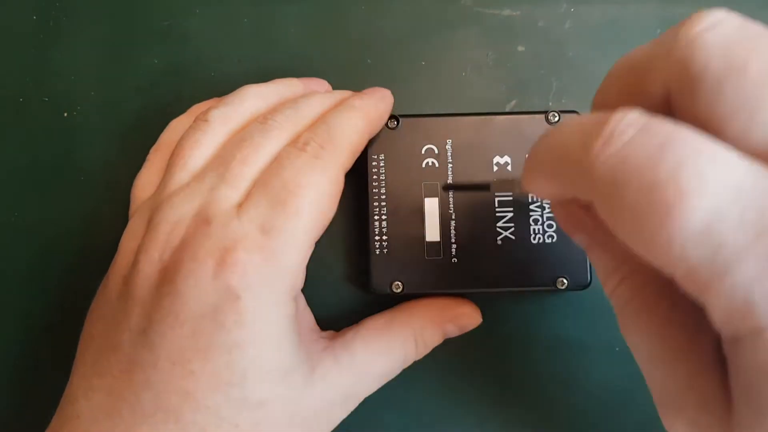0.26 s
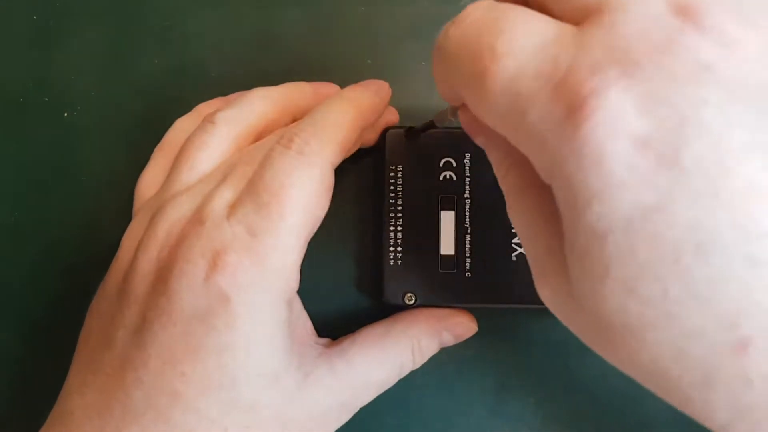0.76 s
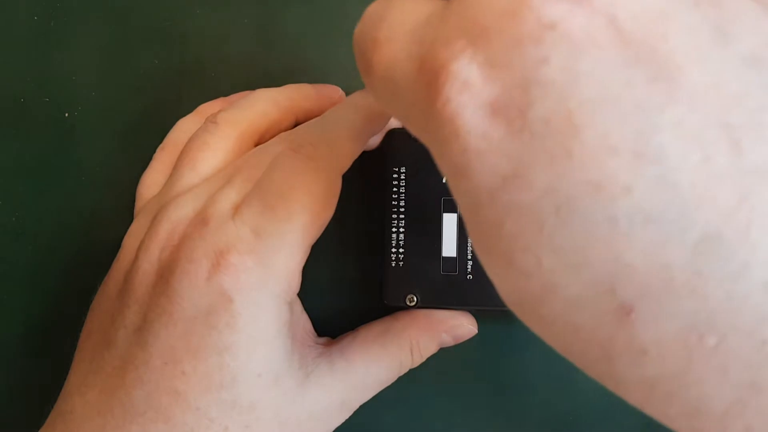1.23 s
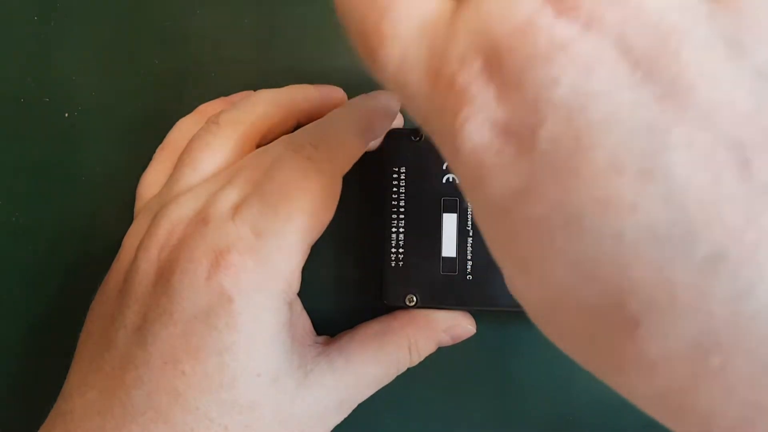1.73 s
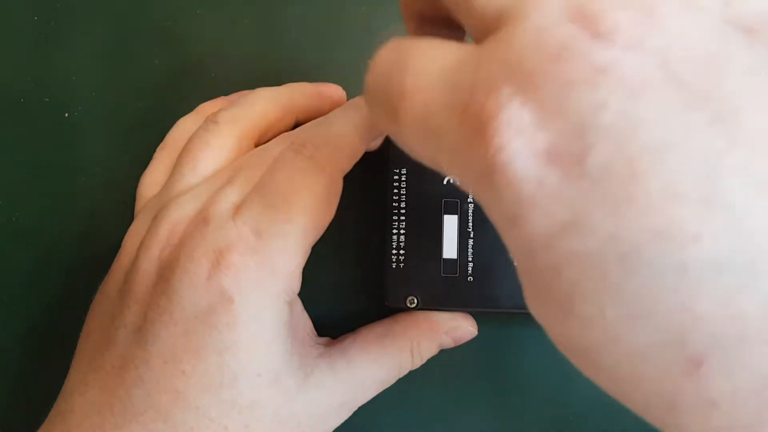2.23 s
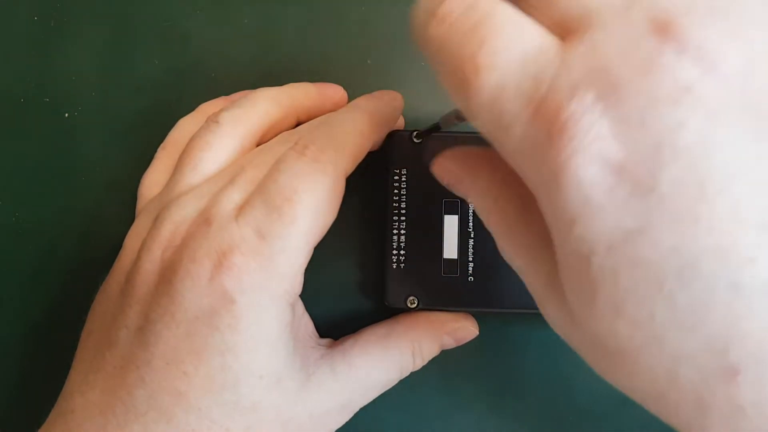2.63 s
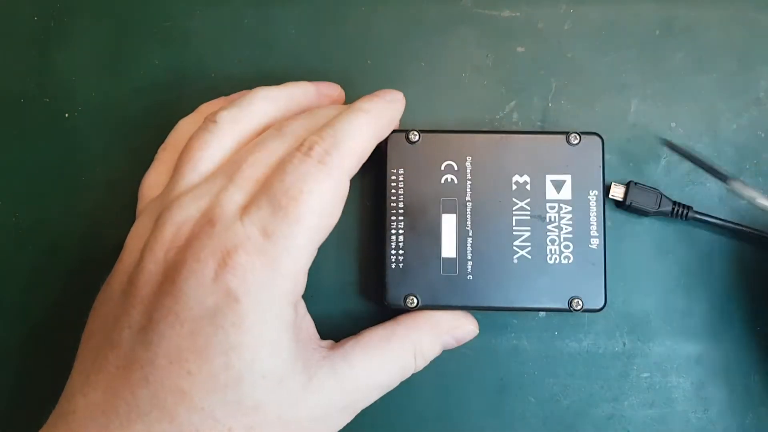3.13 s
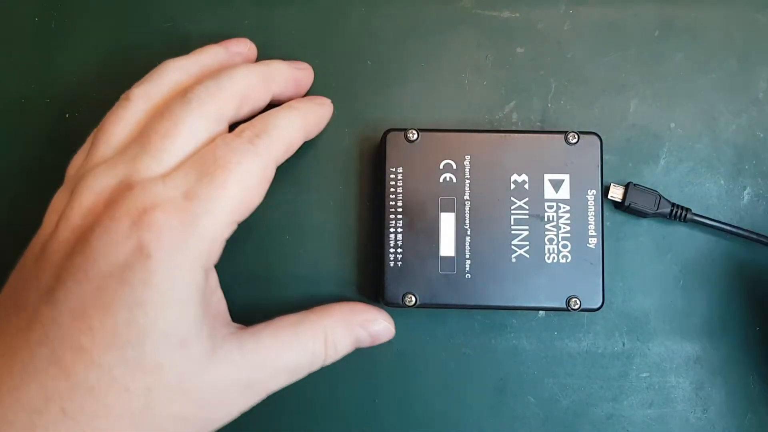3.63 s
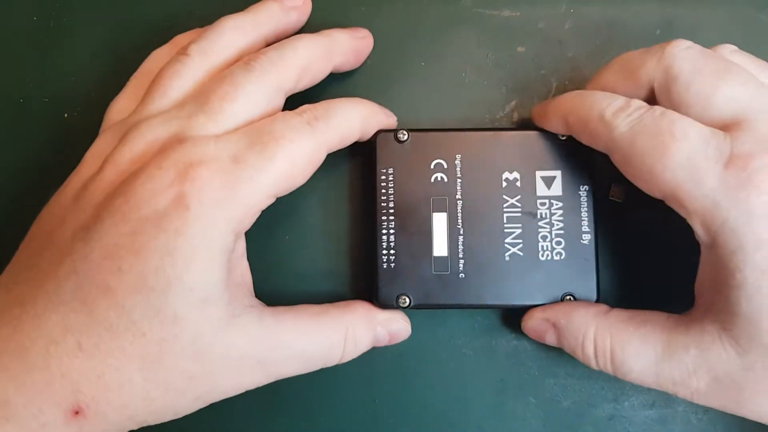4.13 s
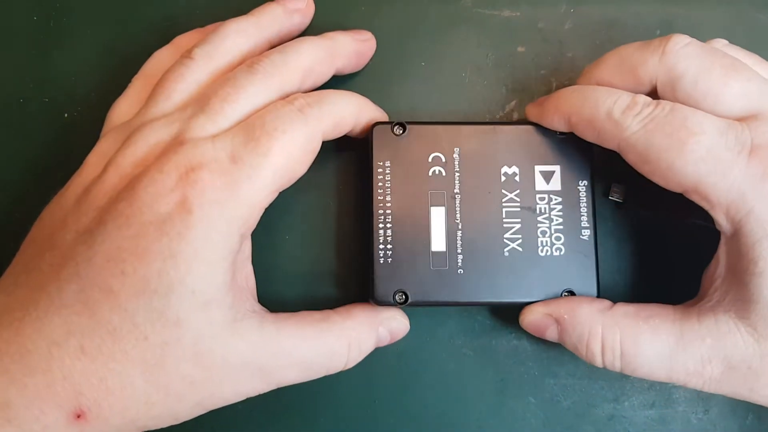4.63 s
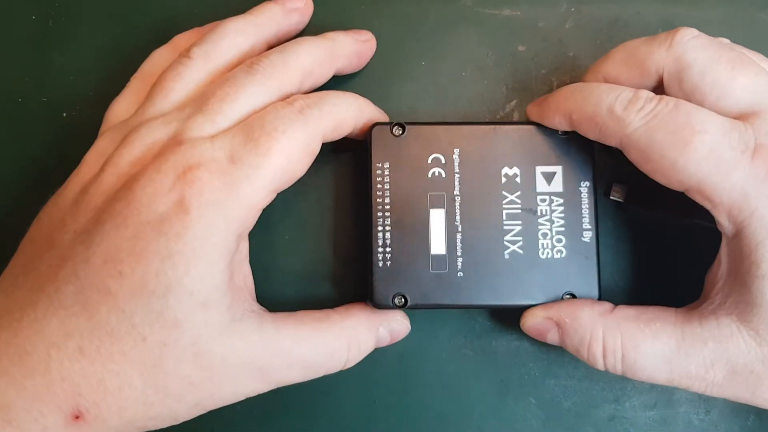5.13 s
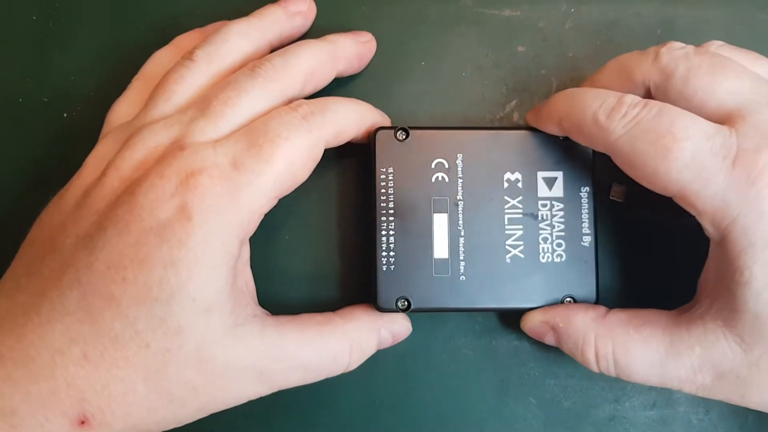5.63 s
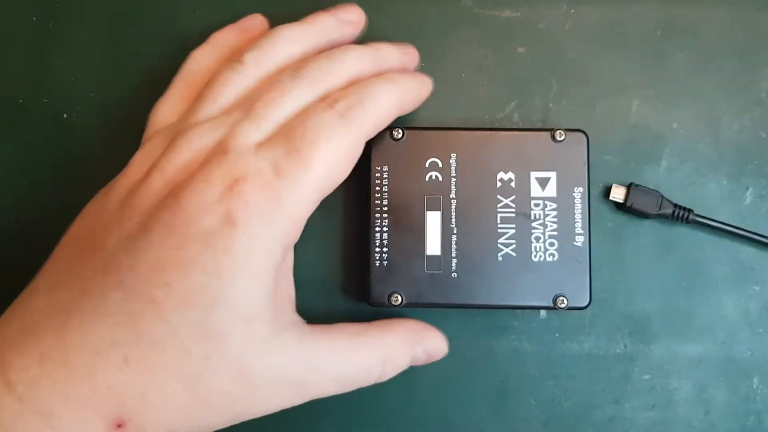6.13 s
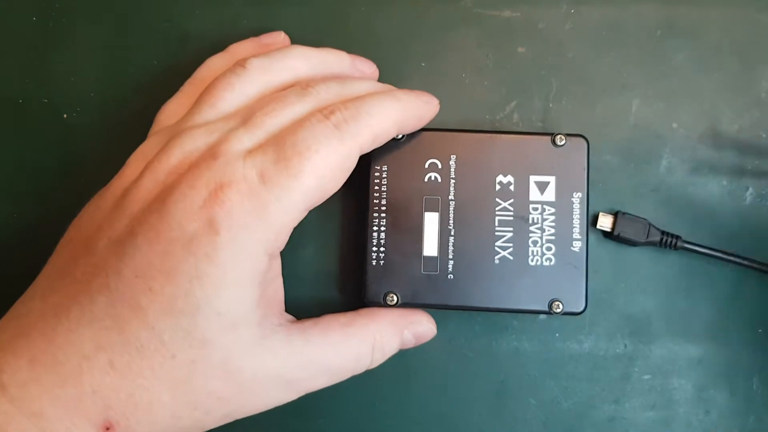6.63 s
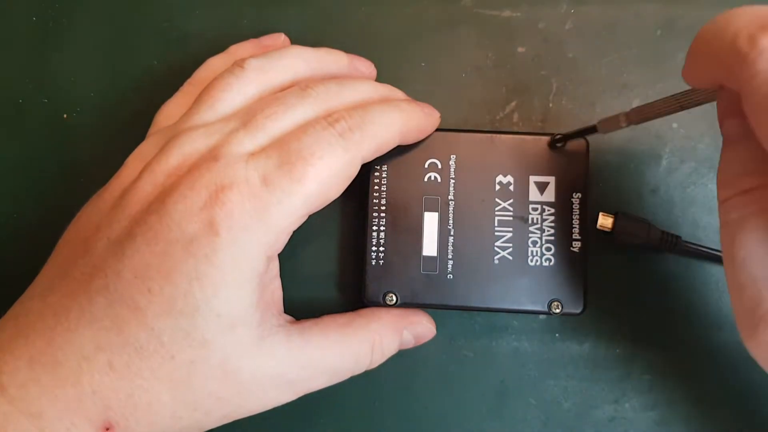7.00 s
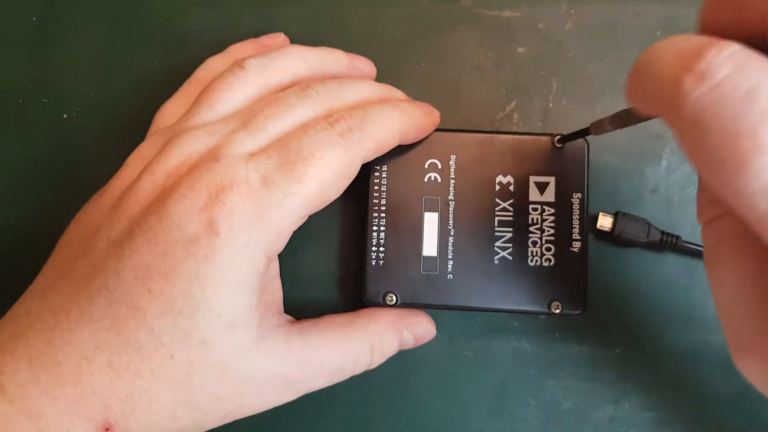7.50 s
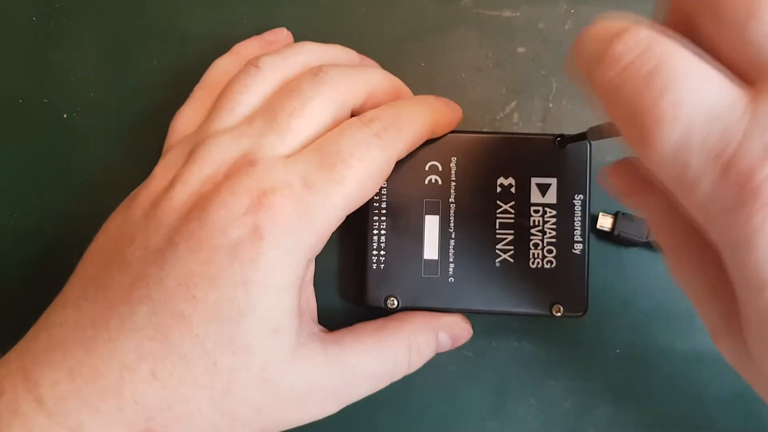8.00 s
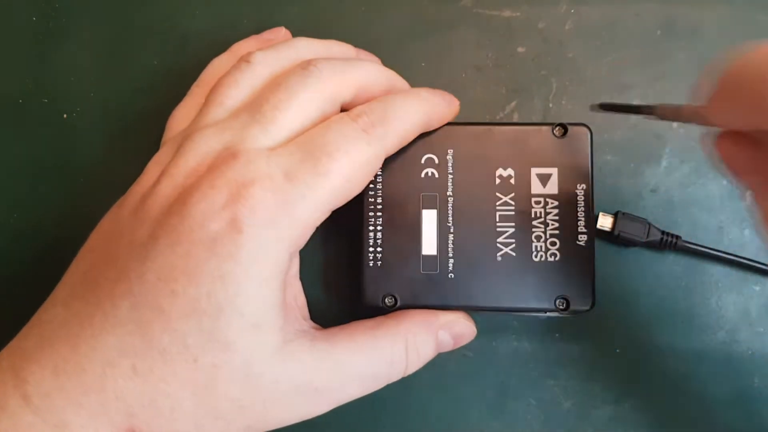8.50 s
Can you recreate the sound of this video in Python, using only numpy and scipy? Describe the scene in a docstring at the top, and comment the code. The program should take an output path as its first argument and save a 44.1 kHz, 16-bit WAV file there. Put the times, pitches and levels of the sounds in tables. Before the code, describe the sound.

Close stereo sound in a small quiet room, with soft low rumble, faint hum and thin hiss throughout. A tiny tick opens; at 0.7 and 1.1 s a screwdriver blade snaps into a screw on a hollow plastic case. From 1.5 to 2.8 s it grinds in short gritty turns with clicks, the strongest knocks near 2.4 s. At 3.2 and 3.35 s the steel tool is laid on the table, clattering with a high bright ring, while a deep drone swells until about 4.5 s. A very soft hand brush passes at 3.8 s. Fingers nudge and slide the case from 4.1 to 4.6 s, then sparse faint ticks; a loud plastic clack and scrape lands at 5.8 s. The tool is picked up with a ping at 6.3 s. Knocks at 6.9 to 7.4 s lead to denser clicks and scrapes at 7.8 to 8.25 s, then near quiet with faint metallic ringing.

```python
"""Screwdriver on a plastic case

A small screwdriver works at the corner screws of a plastic device case lying on a mat on a table.
The blade clicks, scrapes round and rings faintly; fingers shift the case, whose knocks thump in the table top.
Contacts are noise bursts and jerky friction, filtered by the spot, the case and a small room; ringing is dying sines.
Close microphones also hear a soft brush over the mat, room rumble and hiss, a faint hum and a passing drone."""
import sys
import numpy as np
from scipy import signal
from scipy.fft import rfft, irfft
from scipy.io import wavfile

SR = 44100
rng = np.random.default_rng(int(sys.argv[2]) if len(sys.argv) > 2 else 0)


def digitize_waveform(pressure):
    """Quantize a signal to 16-bit integers and store it at the path in sys.argv[1].

    Rows of a 2-D input are taken as channels; values are limited to [-1, 1].
    """
    field = np.atleast_2d(pressure).T
    bounded = np.clip(field, -1, 1)
    quanta = np.round(bounded * 32767).astype(np.int16)
    wavfile.write(sys.argv[1], SR, quanta)


N = 386315
TIME = np.arange(N) / SR   # s


def from_db(db):
    """Decibels to amplitude gain."""
    return 10 ** (np.asarray(db) / 20)


def rms_one(x):
    """Scale to unit power."""
    return x / np.sqrt(np.mean(x ** 2) + 1e-20)


def at(points, x):
    """Read a two-column table along straight lines."""
    return np.interp(x, *np.transpose(points))


def add(out, s, sound):
    """Mix a sound in at time s."""
    i = max(int(s * SR), 0)
    out[..., i:i + sound.shape[-1]] += sound[..., :N - i]


def stereo(pair, side):
    """Two unrelated signals become a shared part and a part opposed between left and right."""
    opposed = pair[1] * np.array([[1], [-1]])
    return (pair[0] + side * opposed) / np.sqrt(1 + side ** 2)


def left_right(pan_db):
    """Split a left-over-right difference in dB evenly between the two channels."""
    return np.array([[.5], [-.5]]) * pan_db


def band_noise_filter(x, low_hz, high_hz):
    """A gentle band-pass."""
    return signal.sosfilt(signal.butter(2, (low_hz, high_hz), "band", fs=SR, output="sos"), x)


def tone(hz, width):
    """A wavering line: noise through a narrow resonance, twice, with a second to settle."""
    b, a = signal.iirpeak(hz, hz / width, fs=SR)
    once = signal.lfilter(b, a, rng.standard_normal(N + SR))
    return rms_one(signal.lfilter(b, a, once)[SR:])


# Spectrum of the room's air. Each row: frequency in Hz, relative density in dB per Hz.
AIR_SPECTRUM = [(20, -25), (33, -17), (46, -3.5), (75, -1.5), (100, -1.5), (200, -9.5), (310, -17),
                (520, -32), (1150, -32.5), (1700, -44.5), (2300, -43), (4000, -46), (8000, -50.5),
                (13500, -46.5)]
# Stereo width of the air. Each row: frequency in Hz, left-right likeness from 0 to 1.
AIR_LIKENESS = [(60, 1), (200, 0.88), (600, 0.68), (2000, 0.16), (12000, 0.32)]
# A deep drone swells and fades. Each row: time in seconds, level in dB.
DRONE_SWELL = [(0, -71), (2.6, -53), (3.1, -45), (3.7, -45.5), (4.3, -46), (4.6, -63), (8.76, -72)]
AIR_DB = -48
HUM_HZ, HUM_DB = 96.4, -52.5
DRONE_HZ = 56.7


def background():
    """Low room rumble under a thin hiss is shaped noise; a faint hum and a passing drone are wavering lines."""
    hz = np.maximum(np.arange(N // 2 + 1) * SR / N, 1)

    def read(table):   # straight lines over log frequency
        table_hz, values = np.transpose(table)
        return np.interp(np.log(hz), np.log(table_hz), values)

    alike = np.clip(read(AIR_LIKENESS), 0, 1)
    side = np.sqrt((1 - alike) / (1 + alike))
    air = stereo(rfft(rng.standard_normal((2, N))), side) * from_db(read(AIR_SPECTRUM))
    hum = from_db(HUM_DB) * tone(HUM_HZ, width=3.3)
    drone = from_db(at(DRONE_SWELL, TIME)) * tone(DRONE_HZ, width=4)
    return from_db(AIR_DB) * rms_one(irfft(air, N)) + hum + drone


# The hand brushes over the mat as it reaches in and as it lets go. Each row: time in seconds, level in dB.
BRUSH_SWELL = [(0, -71), (0.3, -77), (0.5, -95), (3.45, -95), (3.62, -73), (3.8, -67.5), (3.92, -73),
               (4.05, -95)]


def brush(side=0.82):
    """Skin on the mat makes a soft, high hiss: band-limited noise that swells and fades."""
    hiss = band_noise_filter(rng.standard_normal((2, N)), 6000, 12500)
    return from_db(at(BRUSH_SWELL, TIME)) * rms_one(stereo(hiss, side))


def ring(hz, t60):
    """A sine dying by 60 dB in t60 seconds."""
    t = TIME[:SR // 2]
    return np.sin(2 * np.pi * hz * t) * from_db(-60 * t / t60)


# Free ringing of the steel tool. Each row: frequency in Hz, relative level in dB, t60 in seconds.
TOOL_MODES = [(2900, -4, .28), (4000, -3, .24), (4764, -9, .19), (9157, -17, .09), (9700, -8, .18),
              (15740, -4, .17)]
# The tool springs free and rings; the place struck picks its modes.
# Each row: start in seconds, relative level in dB, favoured frequency in Hz.
TOOL_RINGS = [(1.737, -56, 4020), (1.879, -43.5, 4320), (2.362, -47.5, 2490), (2.649, -48, 9900),
              (2.982, -56, 9740), (3.174, -22, 12500), (3.341, -20.5, 9200), (3.350, -21.5, 10700),
              (6.265, -27, 13100), (7.008, -48, 2750), (7.347, -55, 2750), (7.503, -65, 2700),
              (8.525, -57.5, 8930), (8.641, -55, 9650), (8.718, -50, 8950)]


def tool_ringing(reach_octaves=0.26, split_hz=22, twin_db=-6, pan_db=-8):
    """The steel shaft rings in close pairs of bending modes, strongest near the favoured frequency."""
    out = np.zeros((2, N))
    for s, level_db, favoured_hz in TOOL_RINGS:
        for hz, mode_db, t60 in TOOL_MODES:
            share = np.exp(-(np.log2(hz / favoured_hz) / reach_octaves) ** 2 / 2)
            twin = rng.normal(0, 1, (2, 1)) * ring(hz + split_hz, t60)
            pair = ring(hz, t60) + from_db(twin_db) * twin
            add(out, s, share * from_db(level_db + mode_db + left_right(pan_db)) * pair)
    return out


# A blow on an unsupported part of the shell sets that panel ringing.
# Each row: start in seconds, level in dB before panning, frequency in Hz, t60 in seconds.
PANEL_RINGS = [(0.665, -31, 1186, 0.044), (.7455, -27, 697, 0.18), (1.094, -21.5, 1233, 0.044),
               (3.352, -18.5, 1630, 0.029), (3.351, -26, 2550, 0.014), (3.377, -23.5, 405, 0.053),
               (4.153, -30, 1814, 0.046), (5.323, -43, 681, 0.15), (5.802, -18, 1880, 0.029),
               (6.927, -22, 1500, 0.016)]


def panel_ringing(pan_db=-2):
    """Each panel of the shell gives a short note of its own, a dying sine."""
    out = np.zeros((2, N))
    for s, level_db, hz, t60 in PANEL_RINGS:
        add(out, s, from_db(level_db + left_right(pan_db)) * ring(hz, t60))
    return out


# Edges in Hz of the six registers of a contact: thump, knock, clack, tick, snap, fizz.
REGISTER_HZ = [85, 300, 900, 2200, 6000, 10000, 15500]


def in_register(x, index):
    """Band-pass to one register."""
    band = REGISTER_HZ[index:index + 2]
    return signal.sosfilt(signal.butter(3, band, "band", fs=SR, output="sos"), x)


TILT_PIVOT_HZ = 1340   # a harder contact tilts its colour upward about this pitch
TILT_TOP_HZ = 8500     # the tilt levels off above this pitch
# a contact heavier than usual (thump against level, dB) also knocks more (dB per dB)
KNOCK_FOLLOWS_THUMP, USUAL_THUMP_DB = 0.28, 0.5


def contact_gain(index, level_db, hardness, thump_db, colour, pan_db):
    """Gain in one register: the surfaces' colour tilted by hardness; the table's thump has no direction."""
    if index == 0:
        return from_db(thump_db)
    centre_hz = np.sqrt(REGISTER_HZ[index] * REGISTER_HZ[index + 1])
    tilt_db = hardness * np.log2(min(centre_hz, TILT_TOP_HZ) / TILT_PIVOT_HZ)
    weight_db = KNOCK_FOLLOWS_THUMP * (thump_db - level_db - USUAL_THUMP_DB) * (index == 1)
    return from_db(level_db + colour[index - 1] + tilt_db + weight_db + left_right(pan_db))


def spot(x, hollow_hz, bright_hz, hollow_db=9, bright_db=7, hollow_q=9, bright_q=9, soft_hz=11000):
    """The spot touched adds two resonances of its own; plastic softens the very top."""
    hollow = signal.lfilter(*signal.iirpeak(hollow_hz, hollow_q, fs=SR), x)
    bright = signal.lfilter(*signal.iirpeak(bright_hz, bright_q, fs=SR), x)
    rung = x + from_db(hollow_db) * hollow + from_db(bright_db) * bright
    return signal.sosfilt(signal.butter(1, min(soft_hz, SR * .45), fs=SR, output="sos"), rung)


def with_surfaces(kinds):
    """Every event row, followed by the colour, bright pitch and direction of its surfaces."""
    return [(*row, *surfaces) for rows, surfaces in kinds for row in rows]


# What touches what. Each entry: relative levels in dB of knock, clack, tick, snap and fizz,
# bright resonance in Hz before any scatter, left over right in dB.
BLADE_ON_SCREW = ((-3, -0.5, -2, -13.5, -25.5), 2995, -1.2)
BLADE_IN_SLOT = ((-2, -1, -2.5, 1, -5.5), 7270, -0.6)
CASE_ON_MAT = ((-3.5, -1, 1.5, -12.5, -24.5), 2780, -1.8)
TOOL_ON_TABLE = ((-1.5, 1, -3.5, -6.5, -10.5), 9800, -2.5)
# The screwdriver drags over the table. Each row: start and end in seconds, relative level in dB,
# hardness in dB per octave, relative thump into the table in dB, hollow pitch of the spot in Hz.
TOOL_DRAGS = [(3.333, 3.378, -43, -5.5, -72, 1634), (6.226, 6.342, -52.5, -3, -57, 2000),
              (6.326, 6.442, -53, -5, -87, 1070)]
# The case slides on the mat. Each row: start and end in seconds, relative level in dB,
# hardness in dB per octave, relative thump in dB, hollow pitch in Hz.
CASE_SLIDES = [(4.101, 4.172, -41.5, -1, -58, 1580), (4.46, 4.56, -45, -2, -68, 1890),
               (5.716, 5.78, -57, -1, -53.5, 1810), (5.785, 5.806, -31.5, -0.5, -60, 1810),
               (5.8, 5.857, -25.5, -2.5, -37.5, 1680)]
# The blade grinds round in a screw. Each row: start and end in seconds, relative level in dB,
# hardness in dB per octave, relative thump in dB, hollow pitch in Hz.
SCREW_TURNS = [(0.0, 0.035, -43, 3.5, -43.5, 1350), (0.233, 0.357, -61.5, -1, -51, 1220),
               (1.455, 1.54, -59, -5, -46.5, 1200), (1.545, 1.612, -48, 0, -44.5, 1480),
               (1.81, 1.905, -45, 0.5, -34, 1060), (2.1, 2.198, -41, -0.4, -33, 1140),
               (2.381, 2.434, -43, -2.5, -36.5, 980), (2.44, 2.499, -39.5, -0.5, -40.5, 1180),
               (2.697, 2.785, -45, -0.5, -46, 1140), (7.103, 7.167, -63, 2.5, -51, 2220),
               (7.335, 7.382, -45, -3, -40.5, 1080), (7.767, 7.848, -52.5, 0, -43.5, 1000),
               (7.836, 7.865, -30, -0.5, -34, 1207), (7.907, 7.945, -36, -2, -57, 1370),
               (8.028, 8.129, -47.5, 1.7, -50.5, 1920), (8.127, 8.199, -43.5, 0, -58, 2100)]
# Each kind of stroke with the surfaces that meet in it.
STROKES = [(SCREW_TURNS, BLADE_ON_SCREW), (CASE_SLIDES, CASE_ON_MAT), (TOOL_DRAGS, TOOL_ON_TABLE)]


def slips(spread_db=2.5, fall=0.0019, steady=.22, per_s=600):
    """Stick and slip: the force on a sliding contact comes in small uneven jerks over a steady part."""
    jerks = (rng.random(N) < per_s / SR) * from_db(spread_db * rng.standard_normal(N))
    dying = signal.lfilter([1], [1, -np.exp(-1 / (fall * SR))], jerks + 1e-18)
    return steady + rms_one(dying)


def scrapes(index, side, force, crest=0.62, entry=0.15, release=0.17):
    """Each stroke swells and lets go, its friction noise chopped by the slips."""
    out = np.zeros((2, N))
    friction = rng.standard_normal((2, N)) * force
    for start, end, level_db, hardness, thump_db, hollow_hz, colour, bright_hz, pan_db in with_surfaces(STROKES):
        grit = friction[:, int(start * SR):int(max(end, start + .01) * SR)]
        size = grit.shape[1]
        swell = np.interp(np.linspace(0, 1, size), [0, crest, 1], [entry, 1, release])
        rubbed = np.pad(grit * swell, ((0, 0), (0, SR // 40)))   # room for the resonances to die
        # pressure damps the spot
        damped = spot(rubbed, hollow_hz, bright_hz, hollow_db=6.0, bright_db=-6.0)
        stroke = in_register(damped, index)
        stroke /= np.sqrt(np.sum(stroke ** 2, axis=-1, keepdims=True) / size)
        gain = contact_gain(index, level_db, hardness, thump_db, colour, pan_db)
        add(out, start, gain * stereo(stroke, side))
    return out


# a catch: level against its stroke (dB), scatter either way (dB), added hardness (dB per octave)
CATCH_DB, CATCH_SCATTER_DB, CATCH_HARDNESS = -4, 5.5, 1.2
CATCH_FROM = 0.3   # share of the stroke that passes before the pressure is enough to catch


def catches(count=2):
    """Strokes catch at chance moments: small clicks that follow each stroke's strength."""
    strokes, out = with_surfaces(STROKES), []
    chances = rng.random((len(strokes), count, 2))
    for (start, end, level_db, hardness, thump_db, *rest), draws in zip(strokes, chances):
        for when, size in draws:
            size_db = CATCH_DB + CATCH_SCATTER_DB * (2 * size - 1)
            moment = start + (CATCH_FROM + when * (1 - CATCH_FROM)) * (end - start)
            out.append((moment, level_db + size_db, hardness + CATCH_HARDNESS, thump_db + size_db, *rest))
    return out


def on_varied_spots(contacts, scatter_octaves=0.14):
    """No two contacts land on the same spot, so each has a bright pitch of its own."""
    shifts = 2 ** (scatter_octaves * rng.uniform(-0.53, 1, len(contacts)))
    return [(*row, bright_hz * shift, pan_db) for (*row, bright_hz, pan_db), shift in zip(contacts, shifts)]


def clicks(contacts, index, fall, side, rise=0.00065, lead=.0004, crack_fall=0.00077):
    """Each contact is a tight rattle of micro-impacts, a noise burst that dies within milliseconds."""
    out, t = np.zeros((2, N)), TIME[:SR // 16]
    # the first impact is the hardest
    shape = (1 - np.exp(-t / rise)) * (np.exp(-t / fall) + np.exp(-t / crack_fall))
    bursts = rng.standard_normal((len(contacts), 2, len(t))) * shape
    coloured = [spot(burst, hollow_hz, bright_hz)
                for burst, (*_, hollow_hz, _, bright_hz, _) in zip(bursts, contacts)]
    rattles = in_register(np.array(coloured), index)
    rattles /= np.sqrt(np.sum(rattles ** 2, axis=-1, keepdims=True) / (.01 * SR))   # equal energy
    for (s, level_db, hardness, thump_db, _, colour, _, pan_db), rattle in zip(contacts, rattles):
        gain = contact_gain(index, level_db, hardness, thump_db, colour, pan_db)
        add(out, s - lead, gain * stereo(rattle, side))
    return out


def room(x, index, t60, side, first=0.002, build=0.0027):
    """Dense reflections build up after the first wall and die away."""
    t = TIME[:SR // 2]
    shape = (1 - np.exp(-np.maximum(t - first, 0) / build)) * from_db(-60 * t / t60)
    echoes = stereo(rng.standard_normal((2, len(t))), min(2 * side, 1)) * shape
    # scale the echoes to the energy of a plain impulse in this register
    flat = in_register(signal.unit_impulse(len(t)), index)
    echoes /= np.sqrt(np.sum(in_register(echoes, index) ** 2) / (2 * np.sum(flat ** 2)))
    return signal.oaconvolve(x, echoes, axes=-1)[:, :N]


# Resonances of the case on the table. Each row: frequency in Hz, width in Hz, gain of the added resonance in dB.
CASE_MODES = [(167.1, 15, 11), (236.6, 15, -10.5), (381, 51, 3.5), (409, 32, 1.5), (450, 49, -6),
              (547, 51, 3), (690, 16, 9), (826, 9.7, 0.5), (1140, 46, -4.5), (1240, 31, -11),
              (1574, 35, -5), (1810, 70, -12.5), (2760, 64, -6.5), (3624, 51, -2.5), (4484, 160, -6.5)]


def case(x, direct_db=-2.5):
    """The shell and the table top lift and prolong their own frequencies."""
    out = from_db(direct_db) * x
    for hz, width, gain_db in CASE_MODES:
        out = out + from_db(gain_db) * signal.lfilter(*signal.iirpeak(hz, hz / width, fs=SR), x + 1e-18)
    return out


def ports(x, lag=.00008):
    """The sound reaches the right microphone a moment (lag in seconds) after the left."""
    hz = np.arange(N // 2 + 1) * SR / N
    late = irfft(rfft(x[1]) * np.exp(-2j * np.pi * hz * lag), N)
    return np.array([x[0], late])


# The screwdriver is laid down, picked up or lifted clear. Each row: start in seconds, relative level in dB,
# hardness in dB per octave, relative thump into the table in dB, hollow pitch of the spot in Hz.
TOOL_TAPS = [(3.173, -31.5, -1.8, -32, 1330), (3.208, -41, -0.5, -36, 1110), (3.237, -43, -4, -45, 1280),
             (3.25, -51.5, 5, -45, 1280), (3.34, -27.5, -4.5, -89, 1260), (3.351, -29, 1, -34.5, 1680),
             (3.376, -30, -3, -27, 1770), (6.263, -44, 3, -43, 1840), (6.287, -42.5, 1.5, -42, 1980),
             (6.325, -31, -4.5, -35.5, 1230), (6.519, -76.5, 14, -57, 950), (6.608, -76.5, 7.5, -74, 967),
             (6.686, -90.5, 14.5, -82, 975), (8.639, -87, 15.5, -65, 970), (8.68, -84, 16.5, -68, 960)]
# Fingers grip and shift the case. Each row: start in seconds, relative level in dB,
# hardness in dB per octave, relative thump in dB, hollow pitch in Hz.
CASE_KNOCKS = [(3.822, -57.5, -2.5, -35.5, 1480), (3.91, -51.5, 2, -54, 1150), (3.948, -60, 1, -64, 1140),
               (4.152, -34, 1, -38, 1720), (4.242, -53.5, -6.5, -67, 1550), (4.338, -36, -2, -37, 1780),
               (4.386, -50.5, 0.5, -46.5, 1750), (4.483, -49, 2, -65, 1850), (4.502, -41, 4, -51, 1900),
               (4.522, -33, 1.5, -35, 1900), (4.551, -30.5, 1, -47.5, 1960), (4.561, -53, 7, -67, 1900),
               (4.888, -62.5, -4, -61, 1800), (5.108, -56, -0.5, -63, 910), (5.158, -61, -1.5, -61, 1630),
               (5.322, -45, -5, -34.5, 1724), (5.556, -52, 7, -63, 1970), (5.646, -62.5, 5, -59, 1970),
               (5.756, -36, -3.5, -52, 1810), (5.802, -16, 0, -31, 1800), (5.827, -21, -2.5, -47.5, 1660),
               (5.843, -21.5, 1, -40, 1198), (5.848, -21.5, -3, -24, 1184), (5.853, -37, -7.5, -37.5, 1136)]
# The blade snaps into the slot of a screw. Each row: start in seconds, relative level in dB,
# hardness in dB per octave, relative thump in dB, hollow pitch in Hz.
BLADE_SNAPS = [(0.7448, -26, -1, -37, 1175), (0.872, -57.5, -10, -54.5, 1110),
               (1.093, -25.5, 1, -23.5, 1260), (1.144, -34, -3, -38.5, 1240), (1.74, -50.5, 1.5, -44, 1420),
               (2.009, -67, 5, -64, 1090), (2.65, -49.5, 1.3, -39.5, 2070)]
# The blade knocks against a screw head. Each row: start in seconds, relative level in dB,
# hardness in dB per octave, relative thump in dB, hollow pitch in Hz.
BLADE_KNOCKS = [(0.011, -41, 5, -54, 1360), (0.665, -35.5, 0, -36.5, 1140), (1.495, -70, -7, -30, 1220),
                (1.579, -40.5, 0, -43, 1500), (1.592, -52, 5, -38.5, 1440), (1.844, -43, -11.5, -30, 1400),
                (1.87, -36.5, 2, -24.5, 1040), (1.882, -45, 6, -33, 1040), (2.071, -55.5, 4.5, -47, 1260),
                (2.158, -48.5, 5.8, -33, 1180), (2.363, -57, 6.5, -41, 1130),
                (2.4263, -23.5, -1, -17, 1230), (2.481, -21.5, 0, -20.5, 1240),
                (2.695, -37.5, -2, -32, 1190), (2.742, -31.5, -2, -36, 1220), (2.784, -61, 0, -63, 1040),
                (2.812, -51.5, 5, -52, 1180), (2.831, -61, 8.5, -45.5, 1040), (6.927, -30, -3, -32.5, 1060),
                (6.955, -35.5, -4.5, -65, 990), (7.007, -40, 4.5, -41.5, 1050), (7.101, -51, 7, -66, 2180),
                (7.208, -77, -2, -40, 1270), (7.346, -36.5, 5, -38.5, 1140), (7.365, -55, -3, -29.5, 1117),
                (7.504, -56, 5, -49, 1120), (7.554, -57.5, -1.5, -60, 1010), (7.687, -57.5, 3, -43, 1000),
                (7.831, -41.5, 3, -42, 1130), (7.853, -34, -1, -17, 1180), (7.928, -32, 0.5, -45, 1400),
                (8.039, -29.5, 1.9, -39, 2020), (8.094, -45, 5, -63, 1945), (8.114, -42, 3.5, -64, 2000),
                (8.15, -35.5, 4.5, -52, 1980), (8.182, -38, 2, -65, 2010), (8.242, -44.5, -2, -42, 1880)]
# Each kind of blow with the surfaces that meet in it.
BLOWS = [(BLADE_KNOCKS, BLADE_ON_SCREW), (BLADE_SNAPS, BLADE_IN_SLOT),
         (CASE_KNOCKS, CASE_ON_MAT), (TOOL_TAPS, TOOL_ON_TABLE)]
# How each register sounds, thump to fizz. Each row: trim in dB, fall time of a click in seconds,
# side share of the amplitude, room level against the contact in dB, room t60 in seconds.
REGISTERS = [(-6.5, 0.009, .08, -3, 0.42), (-5, 0.0058, 0.23, -5, 0.31), (-3.5, 0.0084, 0.5, -10.5, 0.37),
             (-2.5, 0.011, 1, -11.5, 0.32), (-0.5, .004, 0.95, -9, 0.36), (5, 0.0078, 0.23, -9, 0.3)]


def handling():
    """Clicks and scrapes, register by register, with their room echoes, all coloured by the case."""
    out, force = np.zeros((2, N)), slips()
    contacts = on_varied_spots(with_surfaces(BLOWS) + catches())
    for index, (trim_db, fall, side, room_db, t60) in enumerate(REGISTERS):
        touched = clicks(contacts, index, fall, side) + scrapes(index, side, force)
        contact = from_db(trim_db) * touched
        out += contact + from_db(room_db) * room(contact, index, t60, side)
    return case(out)


def scene():
    """The work on the case over the quiet room."""
    ringing = tool_ringing() + panel_ringing()
    return background() + brush() + ringing + ports(handling())


def record(dry):
    """The top is cut steeply above 16050 Hz."""
    return signal.sosfilt(signal.ellip(10, .1, 80, 16050, fs=SR, output="sos"), dry)


dry = scene()
out = record(dry)
digitize_waveform(out)
```